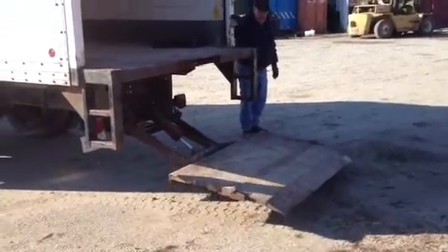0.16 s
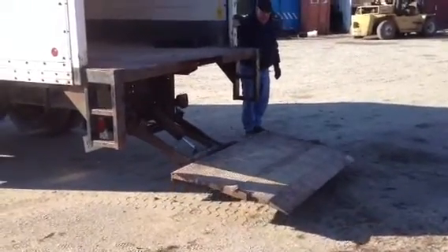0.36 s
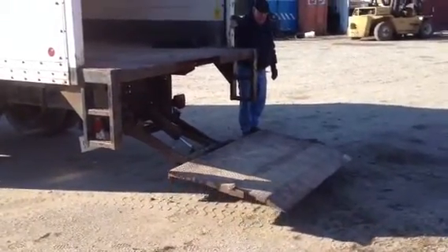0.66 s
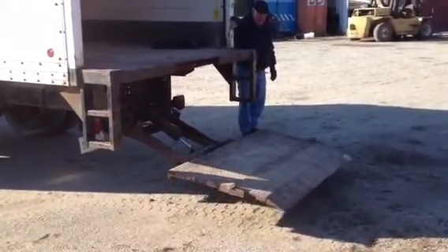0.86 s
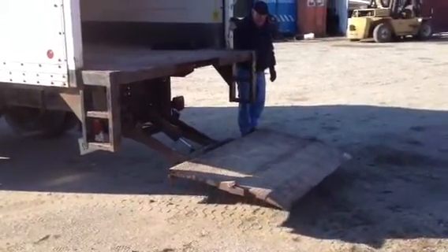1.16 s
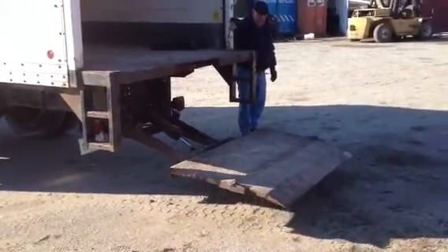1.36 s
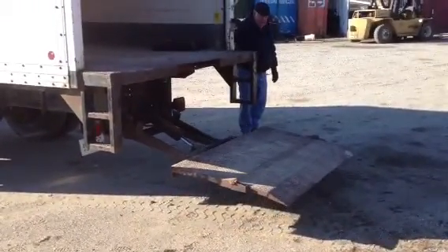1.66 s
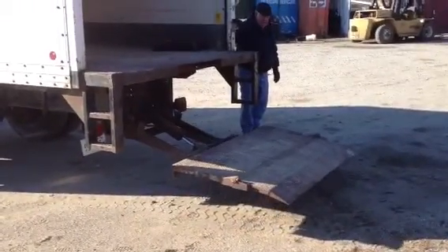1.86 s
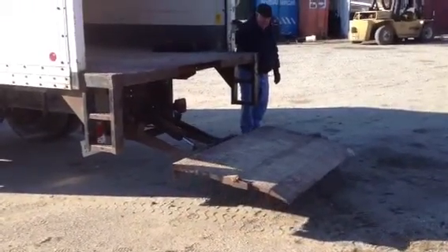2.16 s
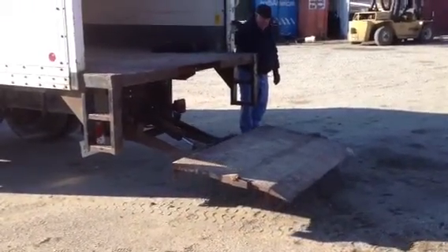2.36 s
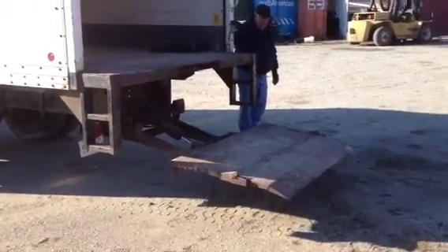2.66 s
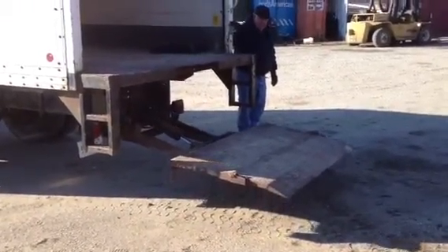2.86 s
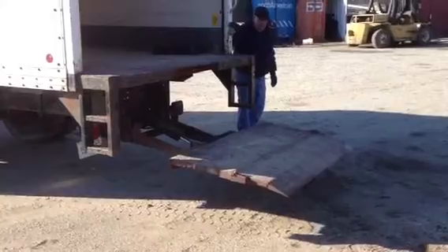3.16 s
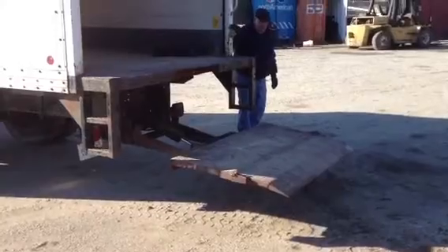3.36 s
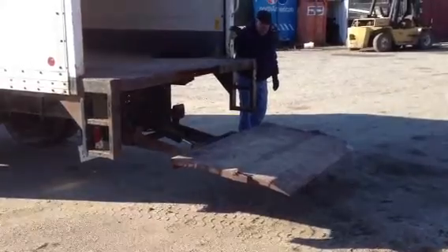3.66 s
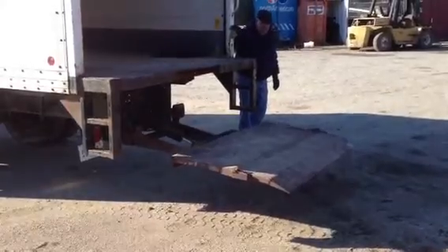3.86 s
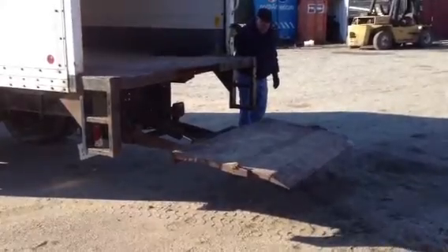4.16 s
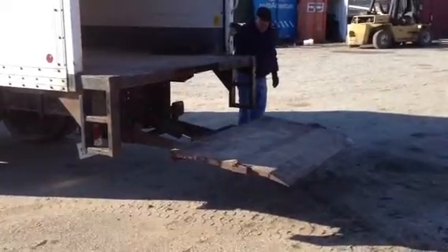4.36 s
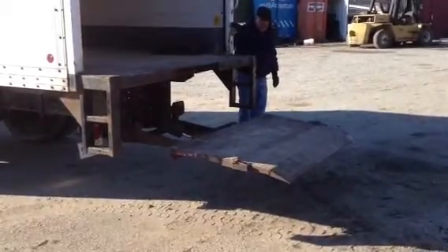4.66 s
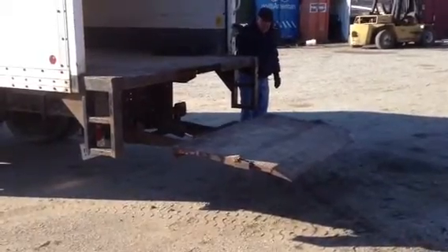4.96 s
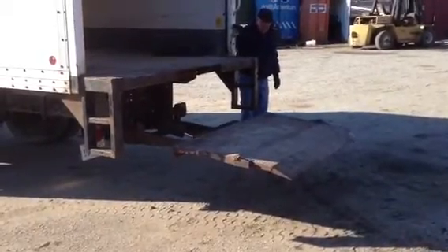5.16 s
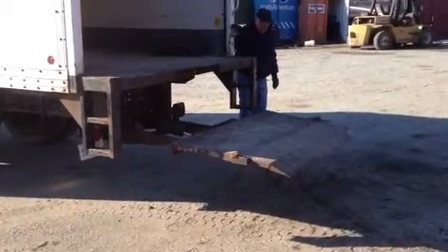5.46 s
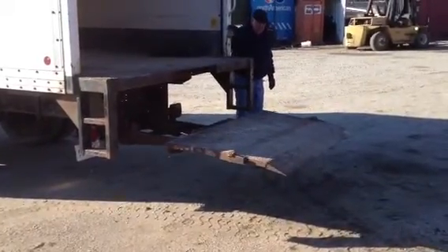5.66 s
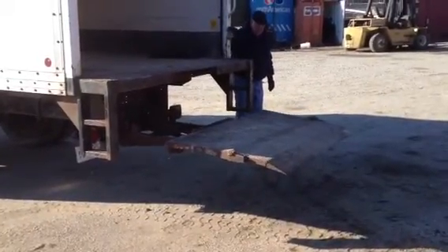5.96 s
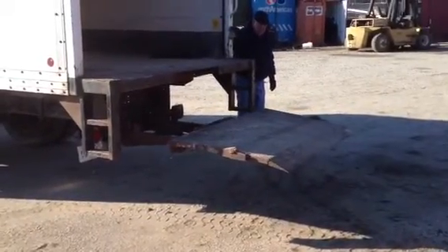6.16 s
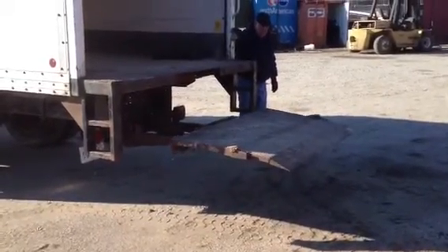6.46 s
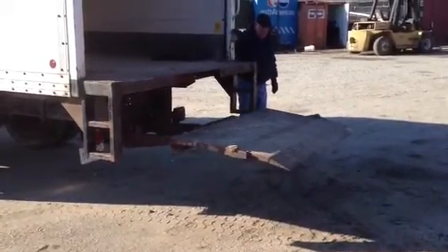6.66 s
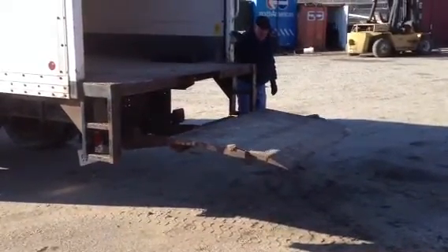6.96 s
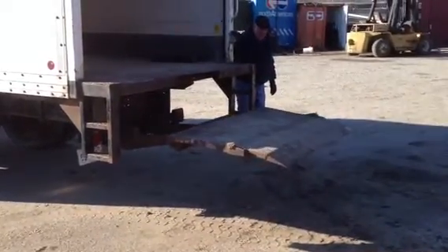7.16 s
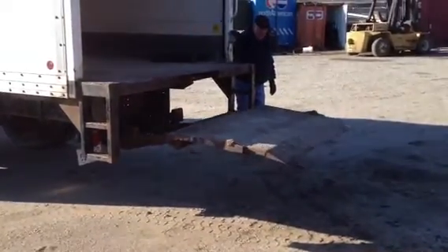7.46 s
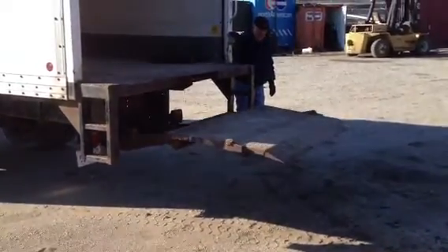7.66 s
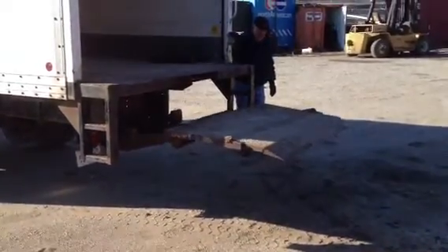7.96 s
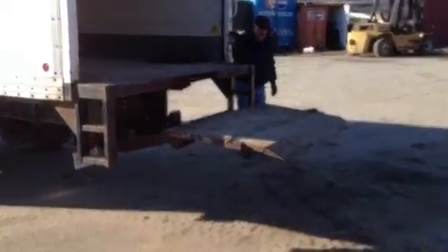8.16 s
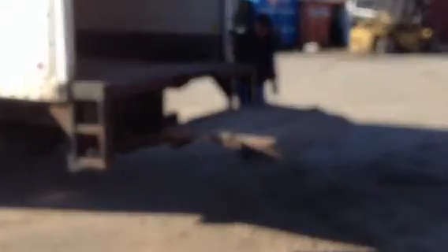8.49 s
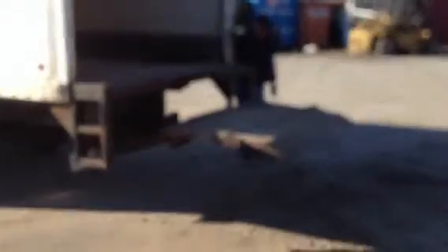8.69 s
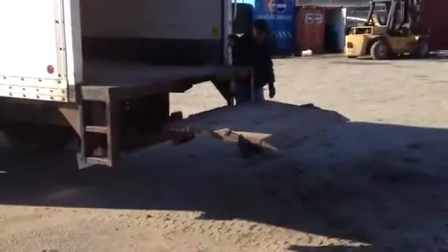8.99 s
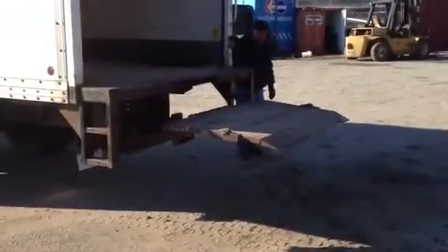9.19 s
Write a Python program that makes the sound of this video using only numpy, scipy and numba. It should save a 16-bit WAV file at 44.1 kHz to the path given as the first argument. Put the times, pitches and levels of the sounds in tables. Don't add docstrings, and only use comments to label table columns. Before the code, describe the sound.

Wind gusts buffet a bare phone microphone while a diesel truck idles with a clattering rattle and a thin hydraulic pump whine lifts the platform.

```python
import sys
import numpy as np
from scipy import signal
from scipy.fft import rfft, irfft, next_fast_len
from scipy.io import wavfile
from scipy.ndimage import uniform_filter1d
from numba import njit

SR = 44100
rng = np.random.default_rng(int(sys.argv[2]) if len(sys.argv) > 2 else 0)


def magnitude_from_level(level_db):
    exponent = np.asarray(level_db, float) / 20
    return 10 ** exponent


def pcm_store(signal):
    levels = np.round(np.clip(np.atleast_2d(signal), -1, 1) * 32767)
    wavfile.write(sys.argv[1], SR, levels.astype(np.int16).T)


N = 411453

FIRING_HZ = 35.006


def unit(x):
    return x / np.sqrt(np.mean(x ** 2))


def curves(table):
    s, *columns = np.transpose(table)
    return [np.interp(np.arange(N) / SR, s, column) for column in columns]


def colour(x, spectrum):
    size = next_fast_len(N)
    hz, db = np.transpose(spectrum)
    bin_hz = np.arange(size // 2 + 1) * SR / size
    gain = magnitude_from_level(np.interp(np.log(bin_hz + 1), np.log(hz), db))
    return unit(irfft(rfft(x, size) * gain, size)[:N])


def butter(x, order, hz, kind="low"):
    return signal.sosfilt(signal.butter(order, hz, kind, fs=SR, output="sos"), x)


@njit
def moving_band(x, hz, width):
    y, band, low = np.empty(len(x)), 0., 0.
    for i in range(len(x)):
        g, k = np.tan(np.pi * hz[i] / SR), width[i] / hz[i]
        v = (band + g * (x[i] - low)) / (1 + g * (g + k))
        band, low, y[i] = 2 * v - band, low + 2 * g * v, k * v
    return y


def ring(pulses, hz, width_hz):
    pole = np.exp((2j * np.pi * hz - np.pi * width_hz) / SR)
    return signal.lfilter([1], [1, -pole], pulses).imag


def peak(x, hz, width_hz):
    return signal.lfilter(*signal.iirpeak(hz, hz / width_hz, SR), x)


def walk(rate):
    k = int(SR / rate)
    held = np.repeat(rng.standard_normal(N // k + 1), k)
    return unit(uniform_filter1d(uniform_filter1d(held, k), k)[:N])


def steady(x, span_s):
    k = int(span_s * SR)
    return x / np.sqrt(uniform_filter1d(uniform_filter1d(x ** 2, k), k) + 1e-9)


# start_s, level_db
BREEZE = [(0, -45), (1.2, -33.5), (2.6, -44.5), (3.2, -40), (4.1, -44), (5.3, -37), (6.3, -44), (7, -46),
          (7.7, -35.5), (8.2, -40.5), (8.9, -31.5), (9.33, -33)]
# start_s, length_s, level_db, edge_db (roughness above the level)
GUSTS = [(0.057, 0.11, -28, -7.5), (0.254, 0.1, -31, -6), (0.458, 0.36, -26.5, -13),
         (.94, 0.064, -26, -8.5), (1.201, 0.053, -27, -21), (1.294, 0.14, -25, -22), (1.52, 0.22, -27, -8),
         (2.04, 0.16, -28.5, -12), (2.308, .39, -25, -9.5), (2.736, 0.16, -24.5, -20),
         (3.571, 0.17, -26.5, -12), (4.293, 0.061, -30, -7), (4.605, 0.097, -28, -6), (4.8, 0.11, -22, -11),
         (4.93, 0.067, -29.5, -17), (5.184, 0.12, -31, -9), (5.49, 0.071, -28.5, -7),
         (5.627, 0.13, -36, 2.5), (5.932, 0.07, -29, -11), (6.063, 0.098, -21, -21),
         (6.503, 0.14, -37, -18), (7.04, 0.095, -36, -17), (7.306, 0.23, -37, -8),
         (7.534, 0.099, -22.5, -11.5), (7.832, 0.16, -30, -5), (8.354, 0.236, -22.5, -16),
         (8.629, 0.173, -17, -4), (8.835, 0.026, -18.5, -12), (9.138, 0.058, -22.5, -20),
         (9.237, .1, -21.5, -10)]
GUST_RISE_S, GUST_FALL_S = 0.0075, 0.012
# centre_s, level_db, pitch_hz, edge_db (roughness above the level)
PUFFS = [(.01, -28.5, 205, -18.5), (1.07, -27.5, 180, -20), (1.15, -29, 200, -13), (1.84, -34, 205, -10),
         (1.929, -23.5, 195, -16), (2.25, -32, 183, -13), (2.99, -26, 192, -11), (3.16, -39, 195, -13),
         (3.25, -31, 190, -10), (3.34, -33.5, 185, -12), (3.39, -37, 200, -10), (3.468, -21, 240, -3.5),
         (3.712, -20, 205, -6), (3.78, -37.5, 220, -18), (3.88, -28.5, 250, -6), (4.178, -22, 233, -16),
         (4.45, -37, 169, -22), (5.06, -34.5, 190, -18), (5.11, -31, 185, -25), (5.419, -22.5, 200, -7.5),
         (5.841, -23.5, 188, -10), (6.3, -27.5, 200, -19), (6.82, -37, 185, -22), (7.08, -27, 178, -16),
         (7.45, -28, 205, -7), (8.384, -12.5, 200, -12), (8.74, -16.5, 237, -13), (8.803, -11, 166, -15),
         (8.959, -20, 205, -8), (9.07, -35, 205, -14)]
PUFF_S = 0.011
EDDY_HZ, EDDY_HZ_PER_DB = 200, 1.5


def airflow():
    t = np.arange(N) / SR
    blow = magnitude_from_level(2 * curves(BREEZE)[0])
    rough = blow * magnitude_from_level(2 * -28)
    for s, length_s, db, edge_db in GUSTS:
        span = slice(max(int((s - .1) * SR), 0), int((s + length_s + .15) * SR))
        rise = np.clip((s - t[span]) / GUST_RISE_S, 0, None)
        fall = np.clip((t[span] - s - length_s) / GUST_FALL_S, 0, None)
        power = magnitude_from_level(2 * db) * np.exp(-rise ** 2 - fall ** 2)
        blow[span] += power
        rough[span] += power * magnitude_from_level(2 * (edge_db - 0.49 * np.clip(-26.5 - db, 0, 20)))
    pitch = blow * (EDDY_HZ + EDDY_HZ_PER_DB * (10 * np.log10(blow) + 25))
    puffs = np.zeros(N)
    for s, db, hz, edge_db in PUFFS:
        span = slice(max(int((s - .1) * SR), 0), int((s + .1) * SR))
        power = magnitude_from_level(2 * db) * np.exp(-((t[span] - s) / PUFF_S) ** 2)
        puffs[span] += power
        pitch[span] += power * hz
        rough[span] += power * magnitude_from_level(2 * edge_db)
    return blow, puffs, rough, pitch / (blow + puffs)


# start_s, peak_db
BUFFETS = [(0.074, -10), (0.137, -9), (0.281, -3.5), (0.485, -9.5), (0.599, -10), (0.762, -12), (0.95, -10),
           (1.217, -11.5), (1.361, -7), (1.415, -9.5), (1.554, -10), (1.59, -6), (2.137, -13),
           (2.317, -6.5), (2.382, -12), (2.439, -7), (2.53, -9.5), (2.628, -4), (2.828, -5.5), (3.571, -15),
           (3.616, -7.5), (4.804, -11), (5.508, -7), (5.554, -10), (5.951, -0.5), (6.014, -4), (7.534, -1),
           (8.624, -11), (9.133, -9), (9.249, -6.5)]
BUFFET_FADE_S = 0.096


def wind():
    blow, slap, rough, hz = airflow()
    t = np.arange(N) / SR
    for s, peak_db in BUFFETS:
        span = slice(int(s * SR), int((s + .4) * SR))
        fall_db = peak_db - 8.0 - 60 * (t[span] - s) / BUFFET_FADE_S
        slap[span] += magnitude_from_level(2 * fall_db)
        rough[span] += magnitude_from_level(2 * (fall_db - 20.0 + 0.32 * (peak_db + 8)))
    blow, slap, rough = (np.sqrt(np.abs(uniform_filter1d(power, size=180))) for power in (blow, slap, rough))
    lumps = rng.standard_normal(N) * magnitude_from_level(5.24 * walk(38) + 3.72 * walk(120))
    hz = np.clip(hz * (1 + 0.088 * walk(20)), 80, 500)
    eddies = lumps
    for width in (1.124, 1.78, 2.96):
        eddies = moving_band(eddies, hz, width * hz)
    body, punch = steady(eddies, 0.029), steady(eddies, 0.015)
    total = np.sqrt(blow ** 2 + slap ** 2)
    pressure = (blow ** 2 * body + slap ** 2 * punch) / total
    edge_spectrum = [(200, 4.5), (450, -12.5), (900, -12), (1400, -16.5), (2500, -36), (5000, -87)]
    edge = steady(colour(lumps, edge_spectrum), 0.011)
    return butter(pressure + rough * edge, 2, [65, 1600], "band")


# start_s, peak_db
POPS = [(0.098, -17), (0.28, -31), (0.6, -19.5), (0.958, -16.5), (1.638, -21.5), (2.319, -18.5),
        (2.42, -22), (2.531, -18.5), (2.806, -17.5), (3.575, -21), (3.609, -17), (4.347, -37), (4.811, -20),
        (5.418, -23), (5.499, -21), (5.954, -19), (6.013, -31), (6.07, -33), (6.47, -25), (7.533, -14.5),
        (8.377, -20), (8.621, -21), (8.635, -14.5), (8.655, -9), (8.723, -9), (8.766, -11), (9.075, -24),
        (9.135, -26), (9.194, -22.5), (9.255, -19)]
POP_MS = 0.57


def pops():
    out = np.zeros(N)
    age = np.arange(-200, 400) / SR * 1000 / POP_MS - 1.6
    suck = np.exp(-age ** 2 * 2)
    for s, db in POPS:
        start = int(s * SR)
        out[start - 200:start + 400] -= magnitude_from_level(db + 7.5) * suck
    return out


# start_s, peak_db, brightness_hz, thud_db
CLICKS = [
    (3.147, -26, 2500, -7),
    (6.471, -22, 1800, 4),
]


def linkage():
    out = np.zeros(N)
    for s, db, hz, thud_db in CLICKS:
        pulse = np.zeros(N)
        pulse[int(s * SR)] = magnitude_from_level(db)
        out += ring(pulse, hz, 1200.)
        out += .22 * ring(pulse, 8500., 5000.)
        out += magnitude_from_level(thud_db) * ring(pulse, 700., 350.)
    return out


# time_s, pitch_hz, level_db
WHINE = [(0, 1608, -60), (.65, 1608, -56), (1.3, 1611, -54), (2.1, 1617, -61), (3.1, 1617, -63),
         (3.5, 1618, -55), (4.1, 1619, -54), (4.8, 1620, -58), (5.6, 1623, -54), (6.45, 1623, -54),
         (7.1, 1624, -58), (7.6, 1624, -53), (8.3, 1625, -52), (9.33, 1626, -53)]
# pitch_hz, level_db
HUMS = [(1340, -67.5), (1880, -67), (2686, -73), (3353, -73), (4958, -86)]


def pump():
    hz, db = curves(WHINE)
    phase = 2 * np.pi * np.cumsum(hz + 0.6 * walk(25)) / SR
    out = magnitude_from_level(db + 1.5 * walk(5)) * (np.sin(phase) + magnitude_from_level(-18) * np.sin(2 * phase))
    for hum_hz, hum_db in HUMS:
        hum_phase = 2 * np.pi * np.cumsum(hum_hz + 5.82 * walk(30)) / SR
        out += magnitude_from_level(hum_db + 2 * walk(4.6)) * np.sin(hum_phase)
    return np.sqrt(2) * out


SKIP_AT_S, SKIP_SAMPLES = 7.53, 1024


def crank():
    n = np.arange(N)
    return (n + SKIP_SAMPLES * (n > SKIP_AT_S * SR)) * FIRING_HZ / SR


INJECTOR_HZ, INJECTOR_WIDTH_HZ, INJECTOR_DB, INJECTOR_S = 6350, 280, -72, 0.0054


def injectors(firings):
    shot = firings.astype(int)
    spit = magnitude_from_level(INJECTOR_DB + 4.9 * rng.standard_normal(shot[-1] + 1))[shot]
    age_s = (firings % 1 - .15) / FIRING_HZ
    jet = rng.standard_normal(N) * spit * np.exp(-(age_s / INJECTOR_S) ** 2)
    return 5.5 * peak(jet, INJECTOR_HZ, INJECTOR_WIDTH_HZ)


# multiple (of the engine cycle rate), level_db
EXHAUST = [(18, -50.5), (24, -49.5), (26, -58.5), (30, -51), (36, -61), (42, -52), (48, -52), (54, -78)]
# pitch_hz, level_db (per Hz)
RUMBLE = [(35, -29), (60, 2), (103, 0), (167, 7), (270, -9.5), (428, -30), (600, -36), (780, -44),
          (1320, -120)]


def exhaust(firings):
    tones = np.zeros(N)
    for k, db in EXHAUST:
        tones += np.sqrt(2) * magnitude_from_level(db + 0.71 * walk(2.8)) * np.sin(2 * np.pi * k * firings / 6 + k)
    return tones + magnitude_from_level(-43.5 + 3.45 * walk(14)) * colour(rng.standard_normal(N), RUMBLE)


CYLINDER_DB = [0, 1.5, 0.5, 2, 0, 0]


def gas_puff(firings):
    shot = firings.astype(int)
    uneven_db = 2.3 * rng.standard_normal(shot[-1] + 1)[shot]
    strength_db = np.array(CYLINDER_DB)[shot % 6] + uneven_db
    return magnitude_from_level(strength_db) * np.sin(np.pi * (firings % 1) ** 0.44) ** 3


# pitch_hz, level_db (per Hz)
HISS = [(2440, -35), (4150, -23), (4380, -7.5), (5600, -9), (6350, 2), (7010, -4.5), (8210, -4),
        (9670, -10), (11000, -8.5), (12200, -17.5), (13900, -15.5), (15300, -18.5)]


def hiss(puff):
    low, middle, top = [rng.standard_normal(N) * (1 + 0.43 * puff) * magnitude_from_level(1.14 * walk(24)) for _ in range(3)]

    def below(x, hz):
        return signal.sosfiltfilt(signal.butter(4, hz, fs=SR, output="sos"), x)

    return colour(top + below(middle - top, 10500) + below(low - middle, 6940), HISS)


def rattle(firings, share, change_s):
    size = int(6 * SR / FIRING_HZ)
    turn = np.arange(N) / (change_s * SR)
    patterns = rng.standard_normal((int(turn[-1]) + 2, size))
    where = (firings / 6 % 1 * size).astype(int)
    which, blend = turn.astype(int), turn % 1 * np.pi / 2
    same = np.cos(blend) * patterns[which, where] + np.sin(blend) * patterns[which + 1, where]
    return np.sqrt(share) * same + np.sqrt(1 - share) * rng.standard_normal(N)


# pitch_hz, level_db (per Hz)
CLATTER = [(290, -51), (500, -18), (546, -9), (622, -7.5), (667, -5), (741, -5.5), (816, -1), (939, 1),
           (1140, -7.5), (1190, -13.5), (1570, -8), (1730, -10), (2880, -13), (4050, -23.5), (5260, -53),
           (8910, -120)]
# pitch_hz, width_hz, level_db
BLOCK = [(684, 21, -6.5), (835, 6.4, -4), (935, 24, -5.5), (960, 8.9, -5.5), (1029.4, 27, -2),
         (1092, 11, -5.5), (1380, 25, -15), (1930, 15, -18), (2020, 20, -11.5), (2140, 28, -14),
         (2890, 37, -18), (3840, 230, -29)]
SPLIT_HZ = 1250


def clatter(firings, puff):
    teeth = 1 + 0.18 * np.cos(2 * np.pi * (3 * (firings % 1) - .6))
    gears = rattle(firings, share=0.71, change_s=2.29) * teeth
    low = butter(gears, 4, SPLIT_HZ)
    high = butter(rng.standard_normal(N), 4, SPLIT_HZ, "high")
    block = np.zeros(N)
    for hz, width_hz, db in BLOCK:
        block += magnitude_from_level(db) * unit(ring(gears if hz < SPLIT_HZ else high, hz, width_hz))
    noise = low + high * (1 + 0.28 * puff) * magnitude_from_level(0.75 * walk(25))
    return colour(noise, CLATTER) + magnitude_from_level(-7.5) * block


# place (in the cycle, 0-6), pitch_hz, width_hz, level_db
KNOCKS = [(0.1713, 960, 480, -32), (1.17, 900, 410, -26), (1.8, 990, 270, -30.5), (2.45, 960, 150, -41.5),
          (3.7, 1000, 290, -50), (4.3, 1400, 390, -46), (5.3, 1000, 250, -39), (4.55, 836, 140, -30.5),
          (6.2, 760, 126, -31), (5.15, 900, 190, -37.5), (4.9, 950, 210, -28), (4.9, 2350, 410, -35),
          (1.1, 2300, 57, -44), (3.4, 1700, 140, -46.5), (4.9, 1800, 90, -42), (0.93, 2800, 110, -63.5),
          (2.2, 2800, 68, -48), (3.18, 2800, 65, -45), (3.5, 2800, 94, -46.5), (2.1, 3500, 120, -53.5),
          (1.12, 3940, 100, -50.5)]
VALVE_ABOVE_HZ = 3600


def knocks(firings, valve_db, scatter_db=0.8, slip_s=.00006):
    out, cycles = np.zeros(N), np.arange(int(firings[-1] / 6) + 1)
    for place, hz, width_hz, db in KNOCKS:
        slip, force = rng.standard_normal((len(cycles), 2)).T
        at = np.searchsorted(firings, 6 * cycles + place) + (slip_s * SR * slip).astype(int)
        inside = at < N
        pulses = np.zeros(N)
        pulses[at[inside]] = magnitude_from_level(db + scatter_db * force)[inside]
        if hz > VALVE_ABOVE_HZ:
            pulses *= magnitude_from_level(valve_db)
        out += peak(ring(pulses, hz, width_hz), hz, 1.16 * width_hz)
    return out


# time_s, clatter_db, hiss_db (above clatter), valve_db (change of the ticks)
ENGINE = [(0, -52.5, -11.5, -10), (2, -51.5, -10.5, -2), (3.1, -51.5, -10, 1), (4.4, -51, -8.5, 2),
          (4.8, -51.5, -10, -11), (5.9, -51, -10.5, 0), (6.2, -51, -9.5, 8), (6.3, -51, -10.5, -2),
          (8.1, -52, -11, -6), (8.22, -53, -10.5, 10), (8.8, -50, -11, 5), (8.9, -54, -9.5, 2),
          (9.33, -52, -13, 4)]


def engine(firings):
    level_db, hiss_db, valve_db = curves(ENGINE)
    puff = gas_puff(firings)
    swell = magnitude_from_level(level_db - level_db.mean())
    metal = swell * (knocks(firings, valve_db) + magnitude_from_level(-45.5) * clatter(firings, puff))
    air = magnitude_from_level(level_db + hiss_db + 1.1 + .8 * walk(24)) * hiss(puff)
    return exhaust(firings) + metal + air


def scene():
    firings = crank()
    machine = engine(firings) + pump() + linkage()
    return (machine + wind() + pops() + injectors(firings))[None]


def top_cut(x):
    return signal.sosfilt(signal.butter(12, 15330, fs=SR, output="sos"), x)


def record(dry):
    x = butter(dry, 3, 90, "high")
    x = signal.sosfilt(signal.ellip(12, .2, 80, 15310, fs=SR, output="sos"), x)
    x = x * np.minimum((N - np.arange(N)) / 300, 1)
    return top_cut(x)


dry = scene()
out = record(dry)
pcm_store(out)
```